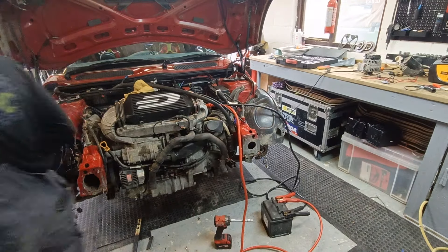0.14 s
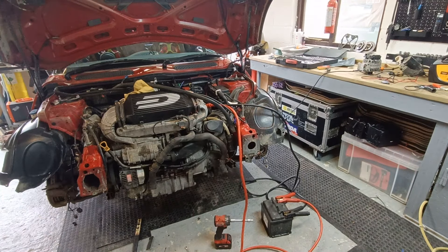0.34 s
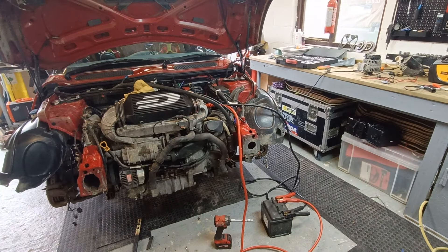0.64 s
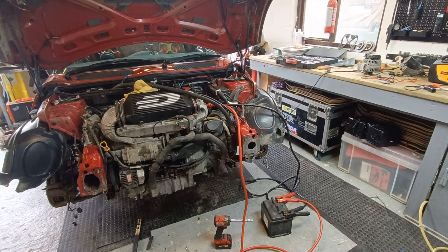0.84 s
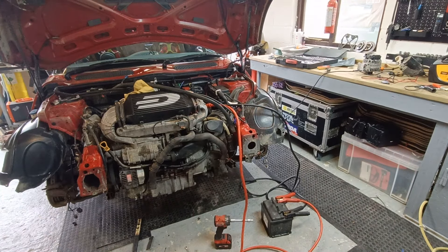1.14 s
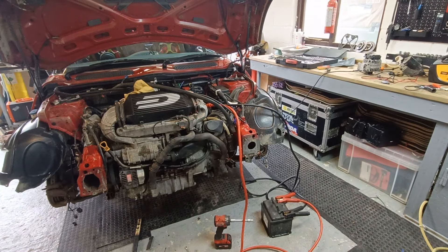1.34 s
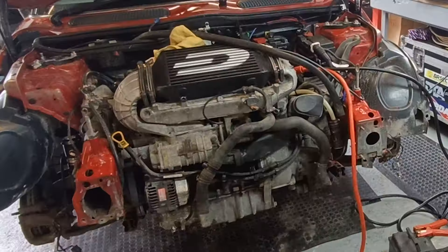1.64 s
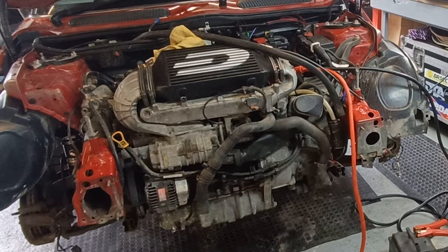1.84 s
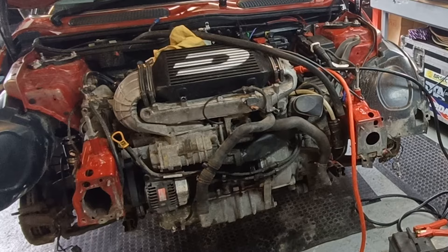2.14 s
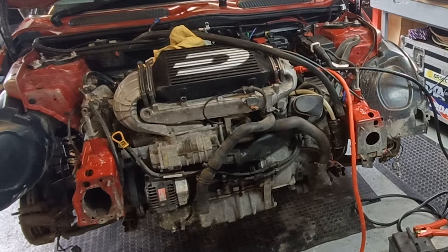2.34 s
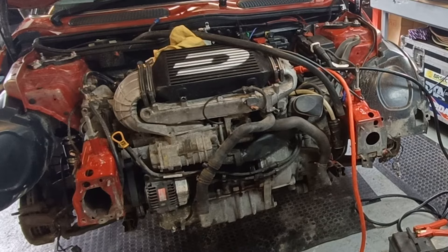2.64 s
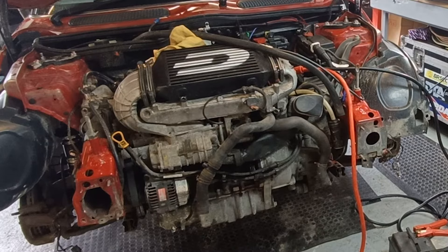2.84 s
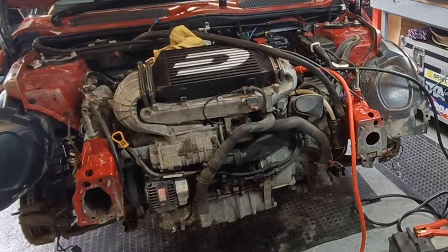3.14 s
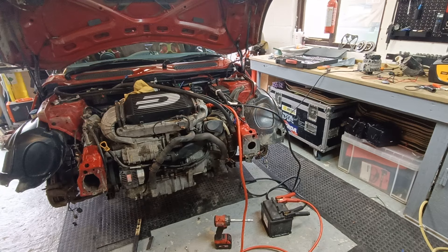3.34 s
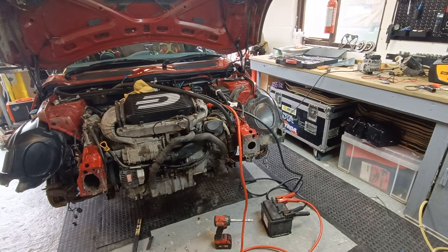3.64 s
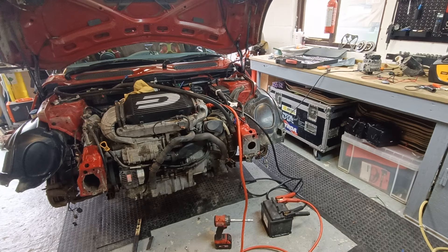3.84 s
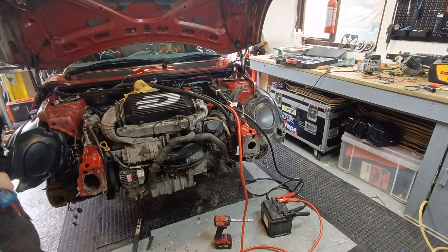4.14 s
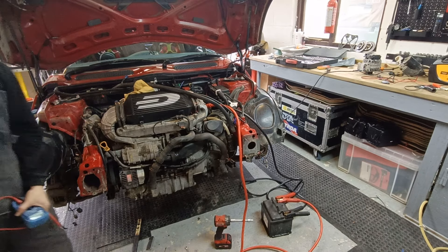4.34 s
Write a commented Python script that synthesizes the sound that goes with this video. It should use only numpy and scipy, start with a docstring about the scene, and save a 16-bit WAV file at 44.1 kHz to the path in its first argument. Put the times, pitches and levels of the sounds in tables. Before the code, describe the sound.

Close stereo view of an exposed engine in a hard-walled workshop: a faint electrical whine, then a loud ringing solenoid clack, quiet whistles, and a softer return clunk. About a second later it slams again and releases more hollowly, amid a few knocks. Footfall-like thuds and a cloth rustle end it. Low room rumble throughout, no cranking.

```python
"""Starter solenoid tried twice in a garage

Two-channel microphone in the garage: the engine never turns. The plunger slides and slams as noise
clashes with ringing casting modes; the return spring clacks it back and a loose panel hums as a sine.
Dull knocks and rustling clothes are shaped noise. Behind lie low rumble, soft swishes, a faint whine
of fuzzy tones and thin bird-like whistles of gliding sines, heard mostly by way of the walls.
"""
import sys
import numpy as np
from scipy import signal
from scipy.fft import rfft, irfft, next_fast_len
from scipy.io import wavfile
from scipy.ndimage import map_coordinates

SR = 44100
rng = np.random.default_rng(int(sys.argv[2]) if len(sys.argv) > 2 else 0)


def int16_out(signal):
    """Quantize to a 16-bit WAV file."""
    q = np.round(np.clip(np.atleast_2d(signal).T, -1, 1) * 32767)
    wavfile.write(sys.argv[1], SR, q.astype(np.int16))


N = 198052  # samples

# Low rumble of the room. Each row: frequency in Hz, relative level in dB per Hz.
RUMBLE_SPECTRUM = [(15, -38.5), (25, -15), (55, -1.5), (123, -7), (153, -1.5), (270, -16.5), (384, -16.5),
                   (714, -29.5), (962, -30.5), (1480, -37), (1740, -38), (2160, -43), (12200, -54),
                   (16000, -62.5)]
# Likeness of left and right in noise. Each row: frequency in Hz, correlation from 0 to 1.
STEREO_LIKENESS = [(30, 0.23), (100, .92), (250, 0.66), (500, 0.66), (1000, 0), (8000, 0.0078)]
# Reverberation of the garage. Each row: frequency in Hz, time to fall 60 dB in seconds.
GARAGE_DECAY = [(100, 0.58), (300, 0.21), (1000, 0.31), (2300, 0.32), (5000, 0.29), (9000, .24),
                (15000, 0.21)]
# Colour of each microphone port. Each row: frequency in Hz, gain in dB.
LEFT_PORT_GAIN = [(100, -0.45), (300, -1.5), (800, 1.5), (2300, 1), (4300, 2), (7000, 1.5), (9000, 5),
                  (13000, -2.5)]
RIGHT_PORT_GAIN = [(100, 0.5), (300, -2), (2300, 3.5), (4300, -2), (7000, 5.5), (8300, -17.5), (10000, -10),
                   (13000, 0.5)]
# Tones of the faint whine. Each row: frequency in Hz, rms level in dB before the gain in whine().
WHINE_TONES = [(764.4, -84.5), (2433, -94.5), (3924, -89.5), (4005, -91), (4457, -88), (4780, -95.5),
               (5233, -99), (5615, -100), (6347, -89), (6944, -102)]
# Soft narrow swishes. Each row: start in seconds, length in seconds, centre in Hz, level in dB.
SWISH_EVENTS = [(0.118, 0.19, 2400, -71), (0.299, 0.38, 4380, -67), (4.352, 0.26, 3520, -60),
                (4.356, .2, 4850, -66.5)]
# Lone peeps of the bird. Each row: start in seconds, level in dB before the direct and wall gains.
PEEP_EVENTS = [(1.655, -74.5), (2.028, -78.5)]
# Two moves in rustling clothes. Each row of a move: time in seconds, rubbing in dB before fabric gain.
CLOTHES_MOVES = [
    [(0.0, -70.5), (0.014, -76.5), (0.074, -80.5), (0.182, -77.5), (0.19, -70), (0.246, -73), (0.296, -70),
     (0.3, -75)],
    [(4.094, -84), (4.1, -66.5), (4.182, -72.5), (4.222, -51.5), (4.284, -65), (4.308, -60), (4.36, -69),
     (4.49, -75)],
]
# Colour of rubbed fabric. Each row: frequency in Hz, relative level in dB per Hz.
CLOTH_SPECTRUM = [(180, -25.5), (300, -8.5), (447, -6.5), (900, -16.5), (2700, -23.5), (3640, -21.5),
                  (7570, -32.5), (8500, -30.5), (11900, -44.5), (16000, -38)]
# Knocks around the car and footfalls. Each row: start in seconds, level in dB, hardness from 0 to 1.
KNOCK_EVENTS = [(0.190, -40, 0.22), (0.28, -45, 0.56), (1.563, -55, 0.23), (3.469, -33, 0.9),
                (3.516, -37, .33), (3.557, -31, .66), (3.594, -33, 0.44), (3.659, -43, 0.75),
                (3.788, -50, 0), (4.188, -30, 0.38), (4.213, -28.5, 0.18), (4.259, -34.5, 0.07),
                (4.306, -29, .28), (4.375, -39.5, 0.45)]
# Parts of a knock, soft to hard contact. Each row: low Hz, high Hz, 60 dB decay in seconds, gain in dB.
KNOCK_BANDS = [(70, 135, 0.51, 0), (181, 290, 0.25, 0), (550, 1200, 0.07, -1), (1498, 3600, 0.13, -5)]
# Modes of starter and engine casting. Each row: frequency in Hz, relative pull-in dB, relative release dB.
CASTING_MODES = [(84, -54, -38), (113.3, -40.5, -33.5), (208, -43, -38.5), (245, -43, -38.5),
                 (442.7, -38.5, -39), (503, -35, -42.5), (581, -39, -35), (1088, -36, -35),
                 (1117, -37, -35.5), (1210, -37.5, -42), (1450, -32, -33.5), (1564, -32.5, -40),
                 (1640, -32.5, -45), (1878, -28, -31), (2060, -33, -31.5), (2085, -30, -41),
                 (2263, -31, -49), (2324, -27.5, -42.5), (2320, -31, -48.5), (2515, -31, -34.5),
                 (2830, -29, -49), (3000, -29, -42), (3030, -32, -43.5), (3490, -33, -28.5),
                 (3570, -36, -45.5), (4140, -37.5, -29), (4280, -37.5, -39.5), (4610, -29, -46.5),
                 (4940, -35, -42.5), (5520, -37.5, -46.5)]
# Ringing time of those modes. Each row: frequency in Hz, time to fall 60 dB in seconds.
CASTING_DECAY = [(100, 0.65), (400, 0.28), (2000, 0.22), (5000, 0.24)]
# Dense metal clash at pull-in and at release. Each row: frequency in Hz, relative level in dB per Hz.
PULL_IN_SPECTRUM = [(53, -47), (90, -15), (296, -16), (568, -10.5), (915, -17), (1090, -7.5), (1270, -11),
                    (1410, -6), (2380, -0.5), (4750, -7.5), (7490, -24), (13700, -26), (16000, -26)]
RELEASE_SPECTRUM = [(41, -33), (70, -7.5), (121, -4.5), (286, -12), (593, 1), (711, -13.5), (892, -9),
                    (1120, -1), (1340, -5), (2270, -8.5), (3330, -0.5), (4690, -4), (7220, -21),
                    (9700, -22.5), (16000, -27.5)]
# The plunger slams home. Each row: start in seconds, level in dB, deep thump in dB.
PULL_IN_EVENTS = [(0.4757, -17, -2), (2.774, -15.5, -3)]
# The spring throws it back. Each row: start in seconds, level, deep thump, hollow knock, treble crack in dB.
RELEASE_EVENTS = [(1.7875, -20, 0, 0, -8), (3.4287, -22.5, 0.5, 6.5, -18.5)]


def amp(db):
    """Decibels to gain."""
    return 10 ** (np.asarray(db) / 20)


def unit(x):
    """Scale to rms 1."""
    return x / np.sqrt(np.mean(x ** 2) + 1e-20)


def along(points, hz):
    """(Hz, value) points read on a log frequency axis."""
    point_hz, values = np.transpose(points)
    return np.interp(np.log(hz + 1), np.log(point_hz + 1), values)


def colour(points):
    """Gain function of a (Hz, dB) spectrum."""
    return lambda hz: amp(along(points, hz))


def band(low_hz, high_hz, order=4):
    """Gain function of a soft-edged band."""
    def gain(hz):
        low_edge = 1 + (low_hz / (hz + 1)) ** (2 * order)
        high_edge = 1 + (hz / high_hz) ** (2 * order)
        return 1 / np.sqrt(low_edge * high_edge)
    return gain


def filtered(x, response):
    """x times a response of frequency."""
    size = x.shape[-1]
    padded = next_fast_len(size + 8192)
    hz = np.fft.rfftfreq(padded, 1 / SR)
    return irfft(rfft(x, padded) * response(hz), padded)[..., :size]


def noise(gain, size):
    """Coloured stereo noise of rms 1; mid and side shares set how alike the ears are."""
    padded = next_fast_len(size)
    hz = np.fft.rfftfreq(padded, 1 / SR)
    angle = np.arccos(np.clip(along(STEREO_LIKENESS, hz), -1, 1)) / 2
    phases = np.exp(2j * np.pi * rng.random((2, len(hz))))
    spectra = phases * gain(hz) * [np.cos(angle), np.sin(angle)]
    mid, side = irfft(spectra, padded)[:, :size]
    return unit(np.array([mid + side, mid - side]))


def add(track, s, sound):
    """Mix a sound into the track at time s, in seconds."""
    first = max(round(s * SR), 0)
    part = track[:, first:][:, :sound.shape[-1]]
    part += sound[..., :part.shape[-1]]


def echo(gain):
    """Half a second of garage reverberation; each frequency dies at its own speed."""
    size = SR // 2
    hz, t, bins = signal.stft(noise(gain, size), SR, nperseg=256)
    decay = amp(-60 * t / along(GARAGE_DECAY, hz)[:, None])
    return signal.istft(bins * decay, SR, nperseg=256)[1][:, :size]


def clash(gain, t, hold, t60, room_db):
    """A blow chatters for a moment, dies fast at its source and lingers in the room."""
    direct = noise(gain, len(t)) * amp(-60 * np.maximum(t - hold, 0) / t60)
    room_build_up = 1 - np.exp(-t / 0.043)
    return direct + amp(room_db) * echo(gain) * room_build_up


def rumble(level_db=-60.0):
    """Steady low room rumble: noise with most of its strength in the bass."""
    return amp(level_db) * noise(colour(RUMBLE_SPECTRUM), N)


def whine(start_s=0.14, end_s=1.67, width_hz=14, tone_db=1, hiss_db=-83):
    """A faint cluster of fuzzy tones over thin hiss, perhaps the fuel pump priming."""
    t = np.arange(N) / SR
    fade_in = np.clip((t - start_s) / 0.035, 0, 1)
    fade_out = np.clip((end_s - t) / 0.12, 0, 1)

    def lines(hz):
        return sum(amp(db) * np.exp(-((hz - f) / width_hz) ** 2) for f, db in WHINE_TONES)

    level = np.linalg.norm([amp(db) for f, db in WHINE_TONES])
    tones = amp(tone_db) * level * noise(lines, N)
    hiss = amp(hiss_db) * noise(band(3400, 6700, order=10), N)
    return fade_in * fade_out * (tones + hiss)


def swishes(spread=1.08):
    """Brief swells of narrow hiss; spread is the ratio of band edge to centre."""
    out = np.zeros((2, N))
    for s, length, hz, db in SWISH_EVENTS:
        swell = signal.windows.tukey(round(length * SR), .5)
        hiss = noise(band(hz / spread, hz * spread, order=16), len(swell))
        add(out, s, amp(db) * swell * hiss)
    return out


def whistle(start_hz, end_hz, length_s):
    """One thin bird note: a sine gliding evenly in pitch, with soft ends."""
    t = np.arange(round(length_s * SR)) / SR
    pitch = start_hz * (end_hz / start_hz) ** (t / length_s)
    return np.sin(2 * np.pi * np.cumsum(pitch) / SR) * signal.windows.tukey(len(t))


def bird(first_s=.745, last_s=1.356, count=7, trill_db=-71.5, direct_db=-6, room_db=-1):
    """An even run of thin falling whistles and two peeps, heard mostly by way of the garage walls."""
    notes = np.zeros((2, N))
    for s in np.linspace(first_s, last_s, count):
        add(notes, s, amp(trill_db) * whistle(start_hz=6650, end_hz=3600, length_s=.036))
    for s, db in PEEP_EVENTS:
        add(notes, s, amp(db) * whistle(start_hz=4140, end_hz=4090, length_s=.05))
    tail = echo(band(100, 12000))
    tail = tail / np.linalg.norm(tail[0])
    walls = signal.fftconvolve(notes, tail, axes=1)[:, :N]
    return amp(direct_db) * notes + amp(room_db) * walls


def shuffle(fabric_db=15.5, catch_db=1):
    """Fabric rubs in uneven little catches; the passing body pushes air at the microphone."""
    out = np.zeros((2, N))
    t = np.arange(N) / SR
    for move in CLOTHES_MOVES:
        rubbing_db = np.interp(t, *np.transpose(move), left=-120, right=-120)
        catches = np.interp(t * 150, np.arange(1000), rng.standard_normal(1000))  # 150 a second
        out += amp(rubbing_db + catch_db * catches + fabric_db) * noise(colour(CLOTH_SPECTRUM), N)
    swell = signal.windows.hann(round(.26 * SR))
    air = noise(band(31, 59), len(swell))[0]  # one channel, so alike at both ears
    add(out, 4.2, amp(-44) * swell * air)
    return out


def knocks(rise_s=0.0038, fall_db=32):
    """Blows on panels and floor: thud, hollow body, knock and scuff; hard contact favours the higher."""
    out = np.zeros((2, N))
    t = np.arange(SR // 2) / SR
    rise = 1 - np.exp(-t / rise_s)
    places = np.linspace(0, 1, len(KNOCK_BANDS))  # from soft to hard
    for s, db, hardness in KNOCK_EVENTS:
        for place, (low_hz, high_hz, t60, gain_db) in zip(places, KNOCK_BANDS):
            part = clash(band(low_hz, high_hz), t, hold=0.005, t60=t60, room_db=-9.5)
            part_db = db + gain_db - fall_db * abs(hardness - place)
            add(out, s, amp(part_db) * part * rise)
    return out


def panel(s=1.79, hz=570, db=-45, t60=.62):
    """The first release sets a loose piece of sheet metal humming: one dying sine."""
    t = np.maximum(np.arange(N) / SR - s, 0)
    return amp(db - 60 * t / t60) * np.sin(2 * np.pi * hz * t)


def ripple(spacing_hz, depth_db):
    """Gain function of countless small treble resonances: a fixed run of peaks and dips."""
    knots = rng.standard_normal(4000)

    def gain(hz):
        peaks = np.clip(map_coordinates(knots, [hz / spacing_hz], mode='mirror'), -2, 1.7)
        treble = np.interp(hz, [2500, 5000], [0, 1])
        return amp(depth_db * treble * peaks)
    return gain


def casting(t, released, tone, blur_hz=6):
    """The casting's modes; reflections blur their phase, differently at each ear for the higher ones."""
    hz, pull_db, release_db = np.transpose(CASTING_MODES)[:, :, None]
    phase, spread = rng.standard_normal((2, len(CASTING_MODES), 1))
    steps = rng.standard_normal((len(CASTING_MODES), len(t)))
    drift = np.cumsum(steps, 1) * np.sqrt(2 * np.pi * blur_hz / SR)
    mode_db = release_db if released else pull_db
    levels = tone(hz) * amp(mode_db - 60 * t / along(CASTING_DECAY, hz))
    # a neighbouring mode's drift serves as the difference between the ears
    skew = (spread + np.roll(drift, 1, axis=0) / 2) * np.minimum(hz / 2200, .8)
    angle = 2 * np.pi * (hz * t + phase) + drift
    return np.array([(levels * np.sin(angle + side * skew)).sum(0) for side in (-1, 1)])


def blow(released, rise_s, chatter_s, crack_db, thump_db=0, knock_db=0, metal=None):
    """One blow of the plunger: a dense clash, the ringing casting and a treble crack."""
    t = np.arange(SR // 2) / SR
    tone = colour([(130, thump_db), (500, knock_db), (1100, knock_db), (1800, 0)])
    spectrum = colour(RELEASE_SPECTRUM if released else PULL_IN_SPECTRUM)

    def clash_gain(hz):
        return spectrum(hz) * tone(hz) * metal(hz)

    body = clash(clash_gain, t, chatter_s, t60=0.16, room_db=-0.5 if released else 0.0)
    body = body + amp(18.5 if released else 14) * casting(t, released, tone)
    if released:
        body = body * amp([[1], [-1.2]])  # dB: leans to the left
    crack = amp(crack_db) * clash(band(10000, 10000), t, chatter_s, t60=.12, room_db=-0.5)
    return (body + crack) * (1 - np.exp(-t / rise_s))


def solenoid(slide_s=.016, slide_db=-9.5):
    """Pull-in is a short, quieter slide and a hard slam; the spring's return is softer and deeper."""
    out = np.zeros((2, N))
    metal = ripple(spacing_hz=70, depth_db=5)
    for s, db, thump_db in PULL_IN_EVENTS:
        slide = blow(False, rise_s=0.0076, chatter_s=slide_s, crack_db=-10.5, knock_db=5.5, metal=metal)
        add(out, s - slide_s, amp(db + slide_db) * slide)
        slam = blow(False, rise_s=0.00081, chatter_s=0.0045, crack_db=-20, thump_db=thump_db, metal=metal)
        add(out, s, amp(db) * slam)
    for s, db, thump_db, knock_db, crack_db in RELEASE_EVENTS:
        clack = blow(True, 0.006, 0.012, crack_db, thump_db, knock_db, metal)
        add(out, s, amp(db) * clack)
    return out


def scene():
    """The solenoid and the small sounds around it, over a low room rumble."""
    background = rumble() + whine() + swishes() + bird()
    return background + shuffle() + knocks() + panel() + solenoid()


def record(dry, top_hz=16100):
    """Each microphone port has its own colour, the right with a treble notch; nothing passes top_hz."""
    def ports(hz):
        return amp([along(LEFT_PORT_GAIN, hz), along(RIGHT_PORT_GAIN, hz)]) * (hz < top_hz)
    return filtered(dry, ports)


dry = scene()
out = record(dry)
int16_out(out)
```